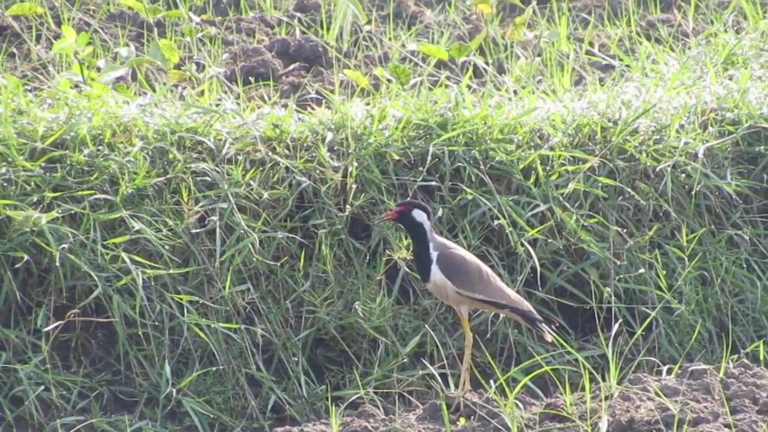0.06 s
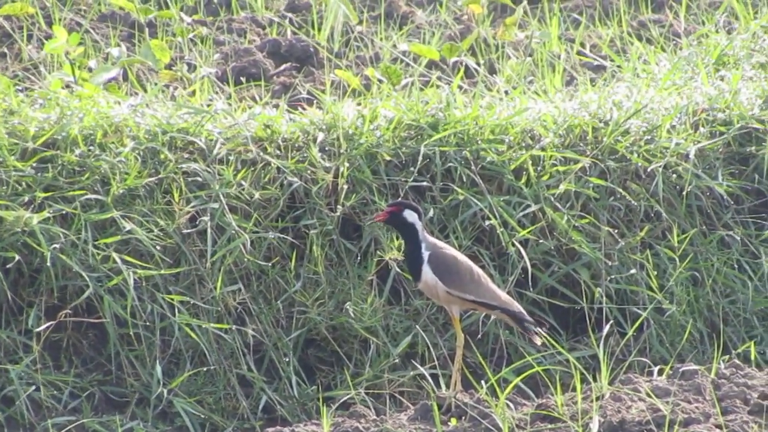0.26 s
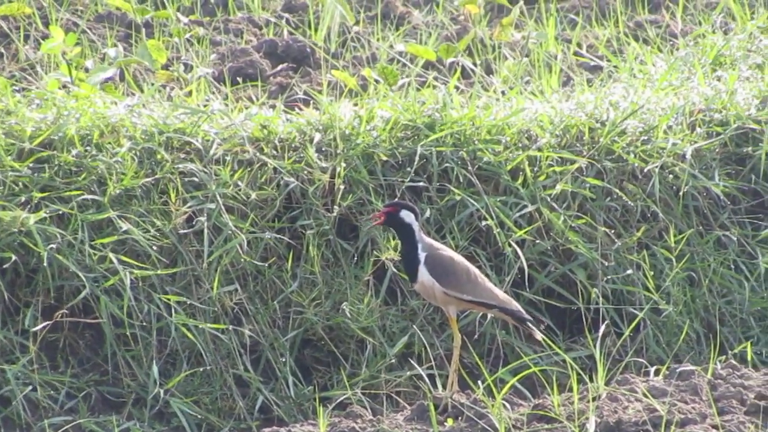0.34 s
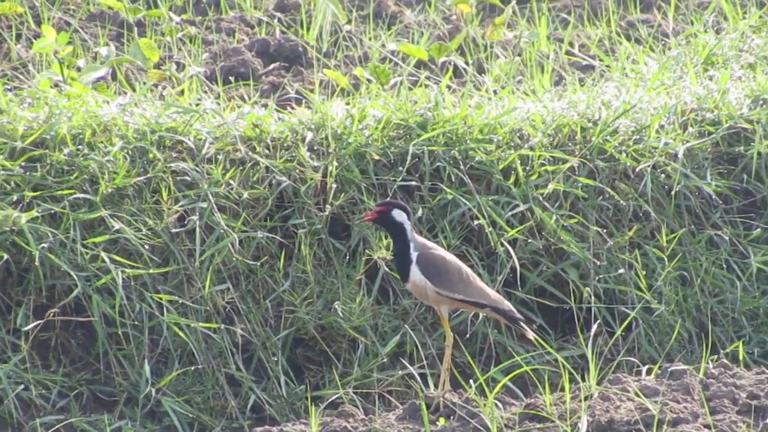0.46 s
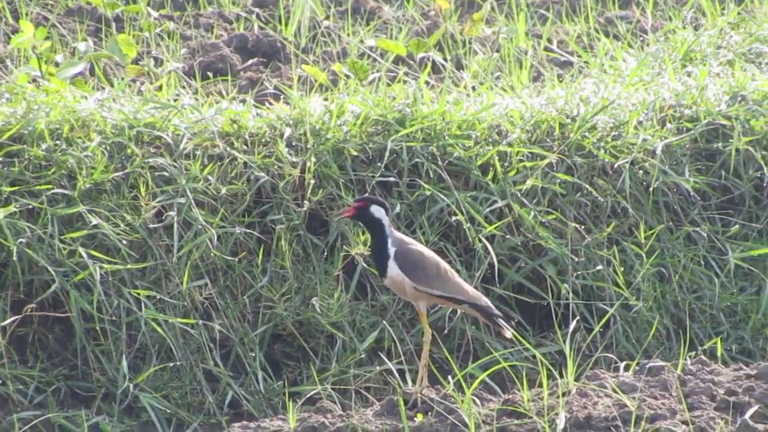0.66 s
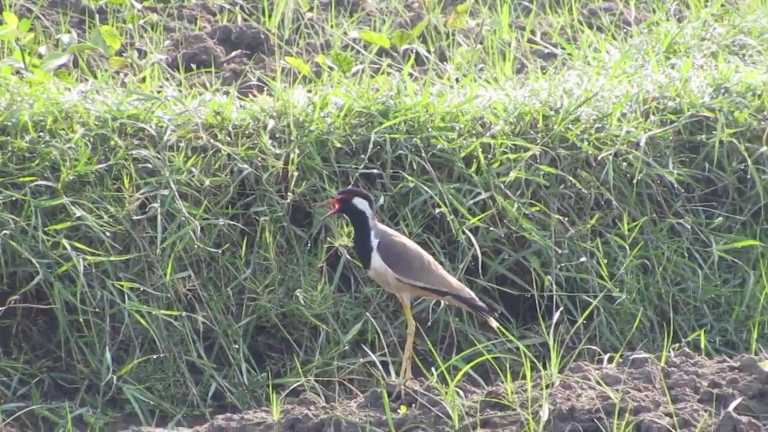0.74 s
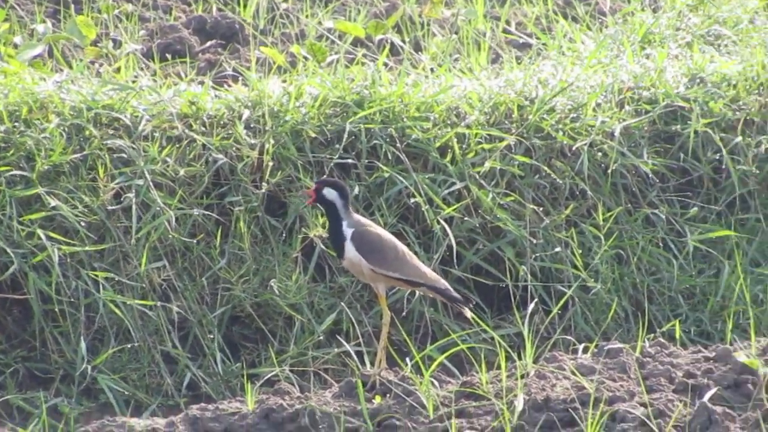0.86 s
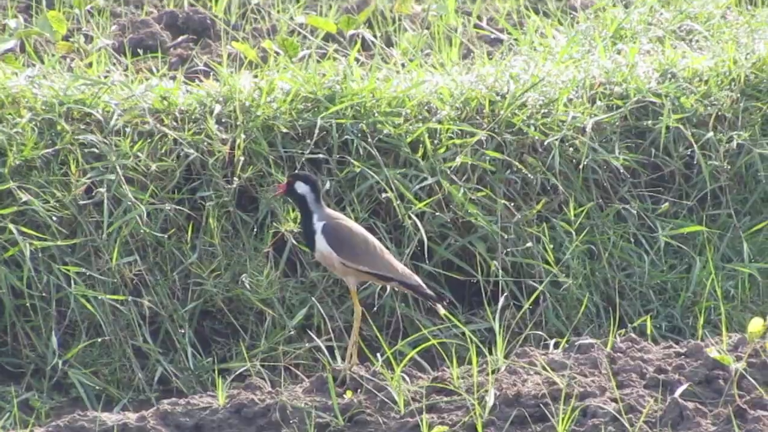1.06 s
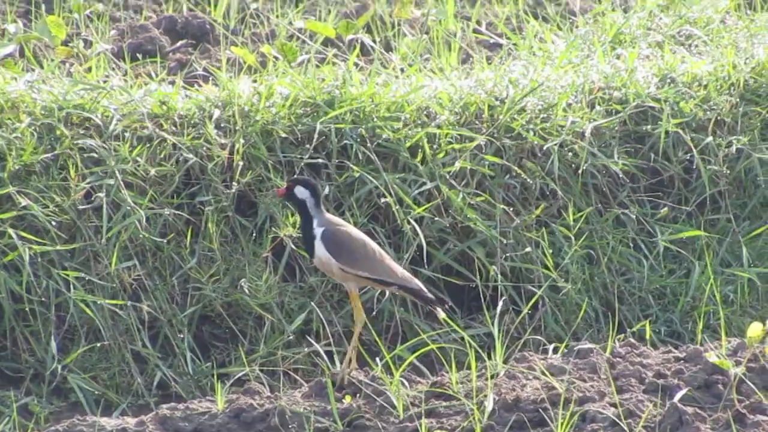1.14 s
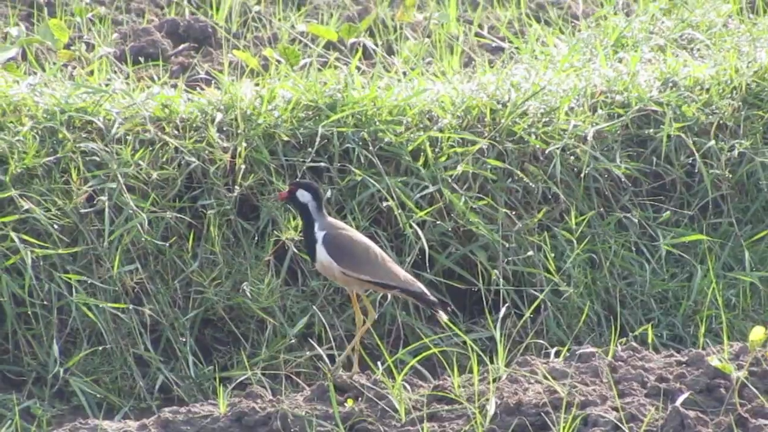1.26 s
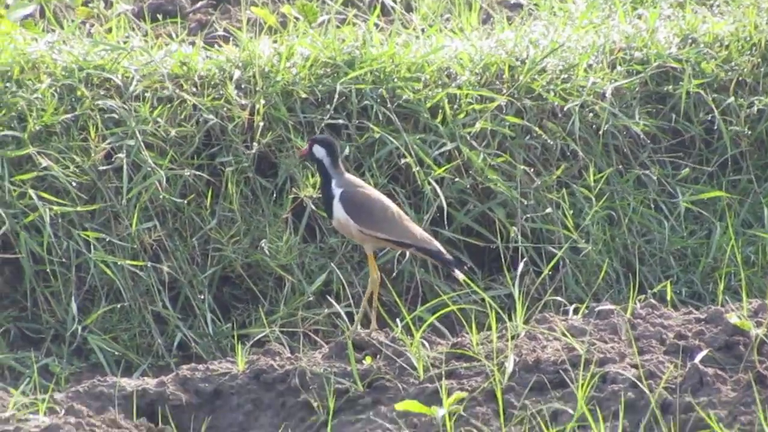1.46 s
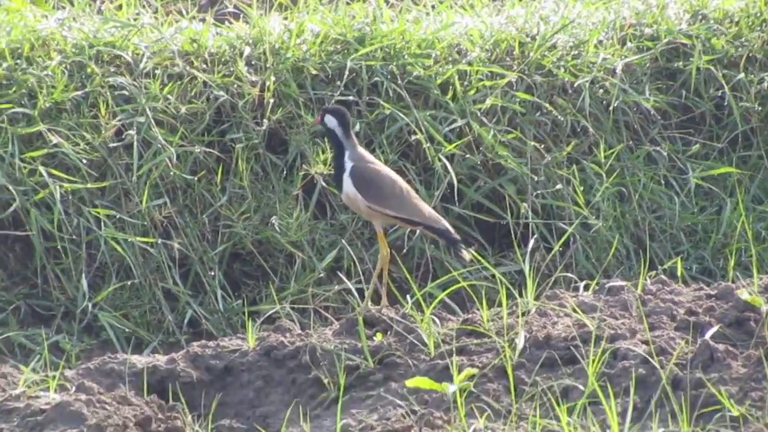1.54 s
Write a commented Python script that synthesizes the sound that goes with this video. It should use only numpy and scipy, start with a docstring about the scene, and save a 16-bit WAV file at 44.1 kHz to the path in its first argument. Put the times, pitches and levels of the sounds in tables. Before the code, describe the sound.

A lapwing on a grassy earth bank gives five sharp, bright calls, first single, then quick trills, with short echoes; faint far birds whistle and twitter over soft field hiss, heard from some distance outdoors.

```python
"""Far birds whistle, coo and scratch over soft field hiss, hums, twitter and a thin high tone that last throughout.
A lapwing on an earth bank then gives five sharp calls, the later ones trilled: pulsed harmonics with puffs of air,
returned by near banks and by grass and ground. Gliding tones make the far whistles, and a chattering phrase
late on; a brief dry rustle of band-limited noise and the start of one more call end the scene."""
import sys
import numpy as np
from scipy import signal
from scipy.fft import rfft, irfft
from scipy.io import wavfile

SR = 44100
rng = np.random.default_rng(int(sys.argv[2]) if len(sys.argv) > 2 else 0)


def boost(x):
    """Linear amplitude factor 10**(x/20) for a level x in decibels (scalar or array-like)."""
    u = np.asarray(x, float) / 20
    return 10 ** u


def materialize(psi):
    """Save the field psi as 16-bit PCM at rate SR to the path in sys.argv[1].

    A 1-D psi becomes a single channel; in a 2-D psi each row is a channel.
    """
    bounded = np.clip(np.atleast_2d(psi).T, -1, 1)
    quanta = np.round(bounded * 32767).astype(np.int16)
    wavfile.write(sys.argv[1], SR, quanta)


N = 70560  # samples: 1.6 s


def in_time(rows):
    """Columns joined by straight lines in time; the first column is in seconds."""
    s, *columns = np.transpose(rows)
    return [np.interp(np.arange(N) / SR, s, column) for column in columns]


def rms_one(x):
    """Scales to rms 1."""
    return x / np.sqrt(np.mean(x ** 2) + 1e-20)


def drift(rate_hz):
    """Random wavering of rms 1: noise through two equal low-pass poles at rate_hz."""
    pole = np.exp(-2 * np.pi * rate_hz / SR)
    noise = rng.standard_normal(N + SR)
    settled = signal.lfilter([1], [1, -2 * pole, pole * pole], noise)[SR:]
    return rms_one(settled)


def band(x, low_hz, high_hz):
    """Gentle band-pass."""
    return signal.sosfilt(signal.butter(2, [low_hz, high_hz], "band", fs=SR, output="sos"), x)


def scatter(x, t60_s):
    """Dense returns from grass and ground: convolution with dying noise of unit energy."""
    t = np.arange(SR // 2) / SR
    build = np.clip(t / 0.016, 0, 1)  # 16 ms rise
    tail = rng.standard_normal(len(t)) * boost(-60 * t / t60_s) * build
    return signal.fftconvolve(x, tail / np.sqrt(np.sum(tail ** 2)))[:N]


def lapwing():
    """Each syllable is a train of sharp pulses: harmonics in step on an arched pitch, with air in each pulse."""
    # sung syllables: start_s, length_s, level_db, change_db (by the end), pitch_hz, end_pitch_hz,
    # brightness_db_per_octave; the pitches are those before the flat onset and the end sag
    syllables = [(.3415, 0.029, -30, 2, 1275, 1279, 2.5), (0.4973, 0.023, -32, 1.5, 1238, 1237, 4),
                 (0.7263, 0.0066, -36.5, 0, 1148, 1200, 1), (0.739, 0.021, -33, -1.5, 1217, 1178, 3.5),
                 (0.8513, .0085, -34.5, 2.5, 1174, 1250, 3), (0.8655, 0.0093, -31.5, -2.5, 1229, 1235, 3),
                 (.8810, 0.01, -31, -3.5, 1222, 1261, 4), (0.8917, 0.02, -33, 2, 1248, 1239, 3.5),
                 (0.9919, 0.0083, -32.5, -13.5, 1223, 1240, 1.5), (1.0033, 0.014, -34, -7, 1262, 1269, 1.5),
                 (1.0196, 0.0087, -27.5, -13, 1231, 1280, 2), (1.0317, 0.012, -35, -7, 1228, 1263, 2),
                 (1.045, 0.014, -37, -3.5, 1221, 1236, 1), (1.0591, 0.029, -40.5, 0.5, 1200, 1187, -11),
                 (1.0903, 0.017, -39.5, -15.5, 1130, 1070, -13.5),
                 (1.5925, 0.026, -47.5, 13, 1345, 1350, 0)]
    # voice spectrum before each syllable's brightness: multiple of the pitch, relative_db
    voice_harmonics = [(1, -17.5), (2, 1.5), (3, 0), (4, 3), (5, -3), (6, -12), (7, -20), (8, -30),
                       (9, -27.5), (10, -31.5), (11, -34), (12, -36)]
    release_s = 0.0055  # of the second harmonic
    breath_db, snap_db, snap_s = -22, -9, 0.002  # steady air, and the burst that opens each syllable

    out = np.zeros(N + SR)
    wavers = [boost(2.84 * drift(94)) for _ in voice_harmonics]  # each harmonic wavers by itself
    jitter = 1 + 0.003 * drift(260)  # pitch roughness
    air = rms_one(band(rng.standard_normal(N), 2200, 6000))
    total = np.sqrt(sum(boost(db) ** 2 for _, db in voice_harmonics) / 2)

    for start, length, db, change_db, hz, end_hz, tilt_db in syllables:
        t = np.arange(int((length + release_s) * SR)) / SR
        at, share = int(start * SR), t / length
        here = np.minimum(at + np.arange(len(t)), N - 1)

        flat_onset = 0.025 * np.exp(-t / 0.003)
        # longer syllables sag more at the end
        end_sag = 1.9 * length * np.exp(np.minimum(t - length, 0.004) / 0.0055)
        pitch = (hz + (end_hz - hz) * share) * (1 - flat_onset - end_sag)
        phase = 2 * np.pi * np.cumsum(pitch * jitter[here]) / SR

        # a 3.2 ms rise, begun 0.28 of the way up
        attack = np.sin(np.clip(t / 0.0032 + 0.28, 0, 1) * np.pi / 2) ** 2
        shape = boost(db + change_db * share) * attack

        for (k, level_db), waver in zip(voice_harmonics, wavers):
            # higher harmonics stop faster
            release = np.clip(0.5 + (length - t) / release_s * (k / 2) ** 0.6, 0, 1)
            fade = np.sin(release * np.pi / 2) ** 2
            gain = boost(level_db + tilt_db * np.log2(np.clip(k, 2, 8) / 3.2)) / total
            pulse_part = np.cos(k * phase + 1)  # 1 rad skews the pulse
            out[at:at + len(t)] += shape * fade * waver[here] * gain * pulse_part

        # the air stops with the highest harmonic
        puff = (boost(breath_db) + boost(snap_db) * np.exp(-t / snap_s)) * (1 + np.cos(phase))
        out[at:at + len(t)] += shape * release * puff * air[here]
    return out[:N]


def bank_echoes(birds):
    """Separate delayed returns from near banks, then scatter that dies away, richer in treble."""
    # returns from the near banks, before the echo filters: delay_s, level_db
    bank_returns = [(.006, -33), (.0125, -15), (.021, -11.5), (.032, -34)]
    t = np.arange(N) / SR
    back = sum(boost(db) * np.interp(t - delay, t, birds, left=0) for delay, db in bank_returns)
    back = back + boost(-6.5) * scatter(birds, 0.093)  # near scatter
    back = back + boost(-15.5) * scatter(birds, 0.47)  # far scatter
    # the treble reaches the listener more by the banks than directly
    high_hz = 14600
    return band(back, 2900, high_hz) + boost(5) * band(back, 7870, high_hz)


def note(rows, harmonics, rough):
    """A gliding tone with flutter, pitch wobble and fast random roughness, faded in and out."""
    hz, db = in_time(rows)
    t = np.arange(N) / SR
    start_s, end_s = rows[0][0], rows[-1][0]
    fade = np.clip(np.minimum(t - start_s, end_s - t) / 0.0011 + 1, 0, 1)
    wobble = 1 + 0.003 * drift(64)
    phase = 2 * np.pi * np.cumsum(hz * wobble) / SR
    tone = sum(boost(level_db + 1.5 * drift(81)) * np.sin(k * phase) for k, level_db in harmonics)
    return np.sqrt(2) * boost(db) * fade * tone * (1 + rough * drift(350))


def far_birds():
    """Whistles and coos, a scratchy chirp and a chattering phrase, all as gliding tones."""
    # distant pure whistles, one table each: time_s, pitch_hz, level_db
    whistles = [
        [(0, 3200, -58), (.015, 3150, -57.5), (.04, 2900, -71)],
        [(0, 1680, -67), (.02, 1620, -55), (.04, 1500, -64)],
        [(.575, 3450, -73), (.597, 3530, -54.5), (.62, 3580, -58), (.635, 3600, -61.5), (.66, 3600, -59.5),
         (.69, 3520, -54.5), (.727, 3450, -68.5)],
        [(.281, 930, -70), (.288, 945, -50), (.312, 950, -53), (.318, 940, -49)],
        [(1.182, 880, -62), (1.195, 930, -51), (1.212, 960, -54), (1.226, 900, -68)],
        [(1.155, 2450, -43), (1.162, 2750, -54), (1.17, 2830, -50)],
        [(1.299, 5100, -69), (1.305, 4100, -66), (1.313, 3600, -61), (1.318, 3550, -75)],
        [(1.536, 4300, -72), (1.545, 3750, -54.5), (1.565, 3930, -63), (1.574, 3920, -66)],
    ]
    # a rough, scratchy chirp: time_s, pitch_hz, level_db
    scratchy_chirp = [(.218, 2970, -64), (.222, 2900, -46.5), (.226, 2775, -62), (.234, 3146, -39.5),
                      (.242, 3145, -45.5), (.247, 3020, -58), (.253, 3460, -42), (.259, 3670, -67),
                      (.275, 3580, -60), (.30, 3510, -67), (.338, 3520, -72)]
    # a farther bird's phrase, one table a note: time_s, pitch_hz (fundamental), base_db (before its harmonics)
    chatter_notes = [
        [(1.10, 690, -58), (1.12, 668, -52), (1.138, 672, -52), (1.149, 740, -48), (1.152, 745, -62)],
        [(1.147, 930, -60), (1.151, 960, -48), (1.160, 1040, -49), (1.166, 930, -53), (1.172, 1030, -62)],
        [(1.164, 1470, -58), (1.172, 1510, -48), (1.178, 1560, -47), (1.183, 1650, -44), (1.191, 1640, -45),
         (1.197, 1530, -57), (1.203, 1550, -65)],
    ]
    # harmonics of each chattered note: multiple of the pitch, relative_db
    chatter_harmonics = [
        [(3, 1.5), (4, -2.5), (6, -13)],
        [(2, 6), (3, 0.5), (4, -13), (5, -25)],
        [(1, -4.5), (2, 0), (3, 2.5), (4, -7.5), (5, -20)],
    ]
    whistled = sum(note(rows, [(1, 0.013)], 0.1) for rows in whistles)
    scratched = note(scratchy_chirp, [(1, 0)], 0.45)
    chattered = sum(note(rows, harmonics, 0.15)
                    for rows, harmonics in zip(chatter_notes, chatter_harmonics))
    return whistled + scratched + chattered


def twitter():
    """Small far birds: quick falling chirps at a loose pace, blurred by distance."""
    # course of the twitter: time_s, pitch_hz (middle of the chirps), level_db
    twitter_course = [(0.0, 5750, -73), (0.048, 5570, -56.5), (0.146, 6160, -66.5), (0.182, 5660, -67),
                      (0.262, 5980, -58.5), (0.298, 6500, -62), (0.57, 5820, -60), (0.606, 5710, -58),
                      (1.032, 6350, -83), (1.1, 5920, -57.5), (1.188, 6530, -72), (1.234, 5770, -56.5),
                      (1.488, 5870, -63), (1.532, 6440, -65), (1.6, 5150, -50.5)]
    chirps_per_s, chirp_s, fall_hz = 95, 0.013, 650  # the pace is that of the median gap
    pitch_spread_hz, level_spread_db = 260, 3
    hz, db = in_time(twitter_course)
    out = np.zeros(N + SR)
    t = np.arange(int(chirp_s * SR)) / SR
    draws = rng.standard_normal((400, 3))
    starts = np.cumsum(np.exp(0.34 * draws[:, 0])) / chirps_per_s
    for s, (_, pitch, size) in zip(starts[starts < N / SR], draws):
        at = int(s * SR)
        glide = hz[at] + pitch_spread_hz * pitch + fall_hz * (0.5 - t / chirp_s)
        chirp = np.hanning(len(t)) * np.sin(2 * np.pi * np.cumsum(glide) / SR)
        out[at:at + len(t)] += boost(level_spread_db * size) * chirp
    out = out[:N]
    return boost(db) * rms_one(out + scatter(out, 0.15))  # as much scattered as direct


def field_hiss():
    """Wind and distance: noise coloured in frequency, slightly patchy in level."""
    # colour of the hiss: frequency_hz, relative_db (density per Hz)
    hiss_colour = [(15, -35), (25, -10), (45, -1.5), (115, -2), (251, -4.5), (375, -4.5), (418, -8),
                   (592, -4), (696, -9.5), (960, -8), (1250, -9.5), (1730, -13.5), (2660, -15),
                   (3480, -19.5), (5630, -21.5), (8500, -23), (12300, -30.5), (15200, -32.5)]
    hz, db = np.transpose(hiss_colour)
    grid_hz = np.arange(N // 2 + 1) * SR / N + 1  # 1 Hz up, to keep the logarithm finite
    colour = boost(np.interp(np.log(grid_hz), np.log(hz), db))
    hiss = rms_one(irfft(rfft(rng.standard_normal(N)) * colour, N))
    return boost(-52.5 + 0.69 * drift(12)) * hiss


def hums():
    """Narrow hums: sines that waver in level and wander in pitch."""
    # hums: pitch_hz, level_db, wander_hz (rms)
    hum_lines = [(61.9, -60.5, 3.33), (601, -69.5, 12.2), (642, -68.5, 7.26), (756.4, -69, 10.3)]
    out = np.zeros(N)
    for hz, level_db, wander_hz in hum_lines:
        level = np.sqrt(2) * boost(level_db + 2.8 * drift(11.4))
        out += level * np.sin(2 * np.pi * np.cumsum(hz + wander_hz * drift(8.2)) / SR)
    return out


def thin_tone():
    """A thin high sine of steady pitch and wavering level."""
    t = np.arange(N) / SR
    return np.sqrt(2) * boost(-76.5 + 1.5 * drift(15)) * np.sin(2 * np.pi * 11793 * t)


def rustle():
    """A brief dry rustle: a bell-shaped burst of narrow-band noise."""
    t, centre_hz = np.arange(N) / SR, 10100
    noise = rms_one(band(rng.standard_normal(N), 0.94 * centre_hz, 1.05 * centre_hz))
    return boost(-62) * noise * np.exp(-((t - 1.574) / 0.007) ** 2)


def scene():
    """Birds with their echoes over the field."""
    near, far = lapwing(), far_birds()
    back = bank_echoes(near + boost(-1.5) * far)
    background = field_hiss() + hums() + thin_tone() + rustle()
    return (near + far + back + twitter() + background)[None]


def band_limit(x):
    """A steep low-pass at the top of the band."""
    return signal.sosfilt(signal.butter(12, 15750, fs=SR, output="sos"), x)


def record(dry):
    """A narrow dip in the microphone's treble, then a steep cut of the top."""
    dip_hz, dip_width_hz, dip_depth = 7880, 300, 0.7  # depth as a share of the amplitude
    peak = signal.lfilter(*signal.iirpeak(dip_hz, dip_hz / dip_width_hz, fs=SR), dry)
    top_cut = signal.cheby2(12, 50, 15550, fs=SR, output="sos")  # 50 dB down from 15550 Hz
    mix = signal.sosfilt(top_cut, dry - dip_depth * peak)
    return band_limit(mix)


dry = scene()
out = record(dry)
materialize(out)
```